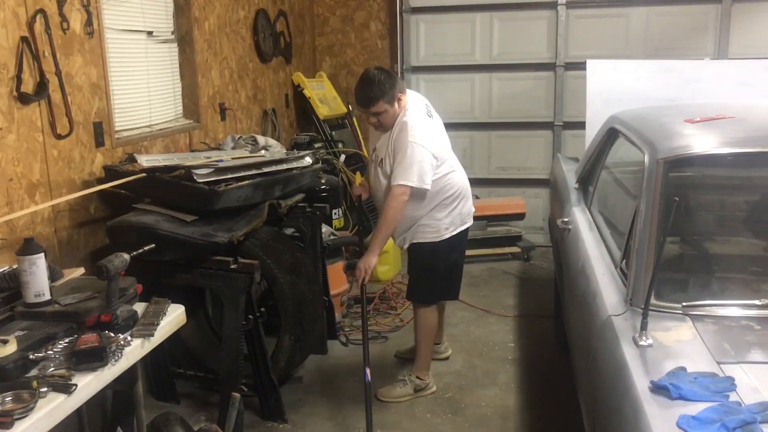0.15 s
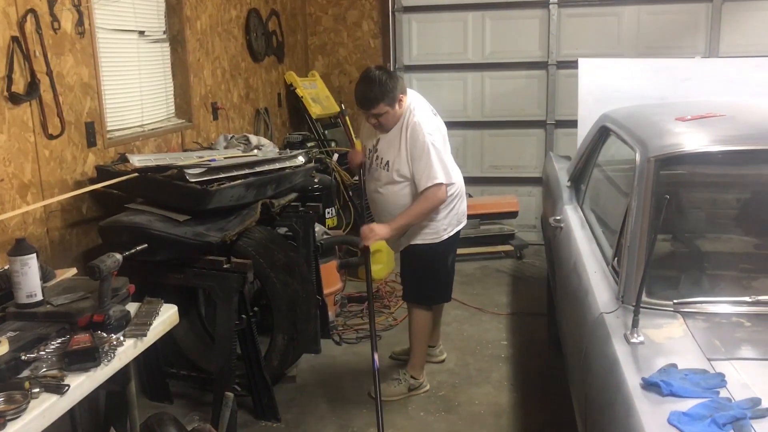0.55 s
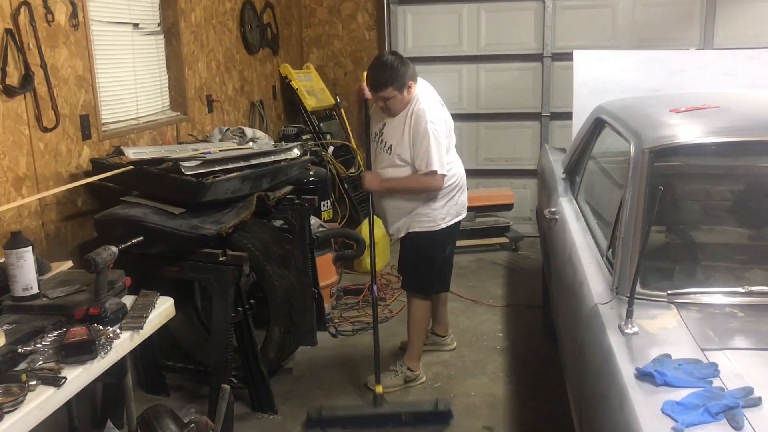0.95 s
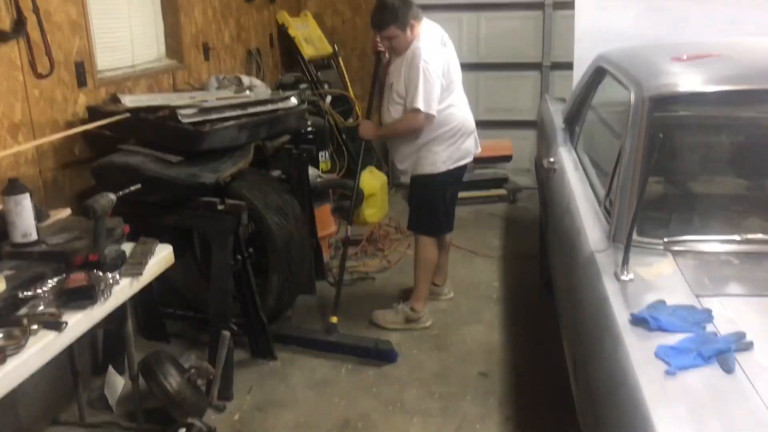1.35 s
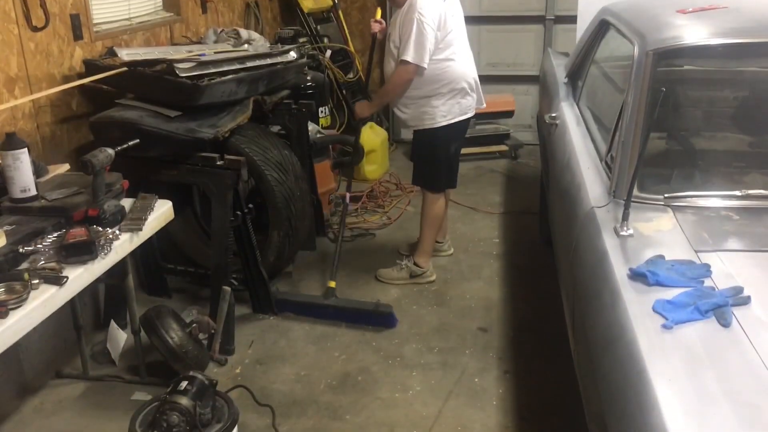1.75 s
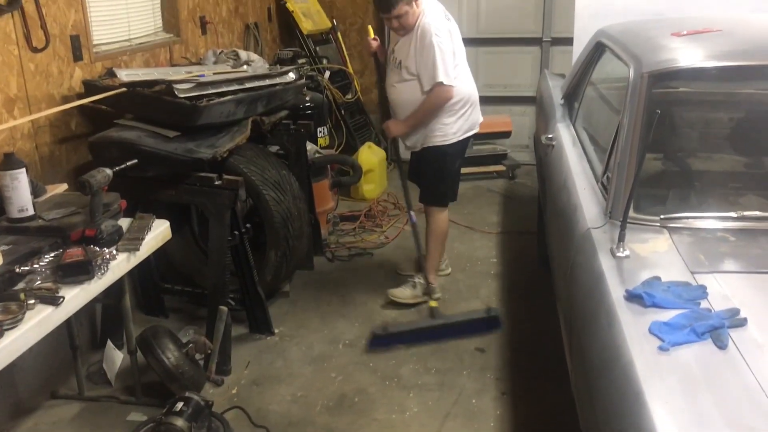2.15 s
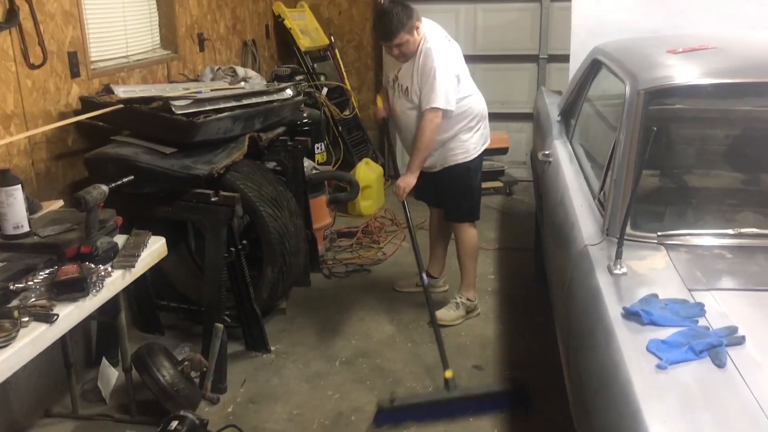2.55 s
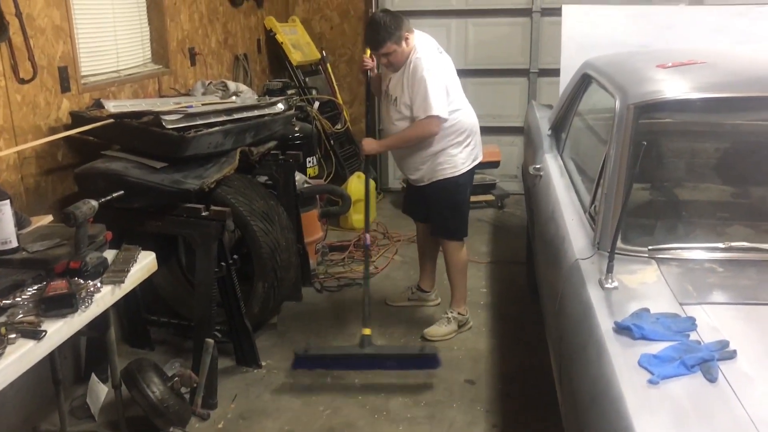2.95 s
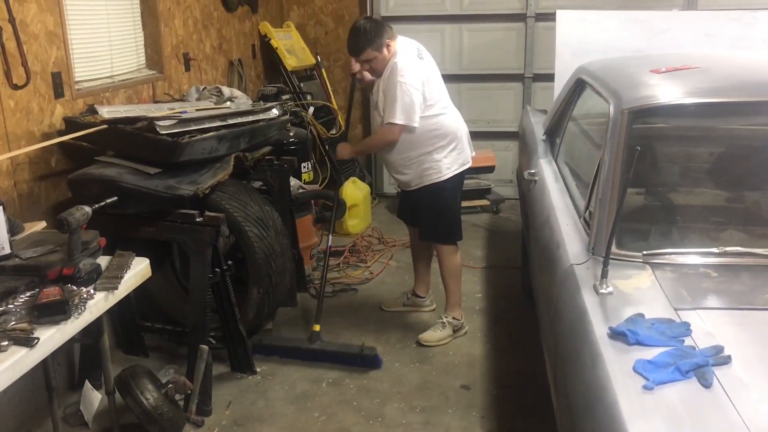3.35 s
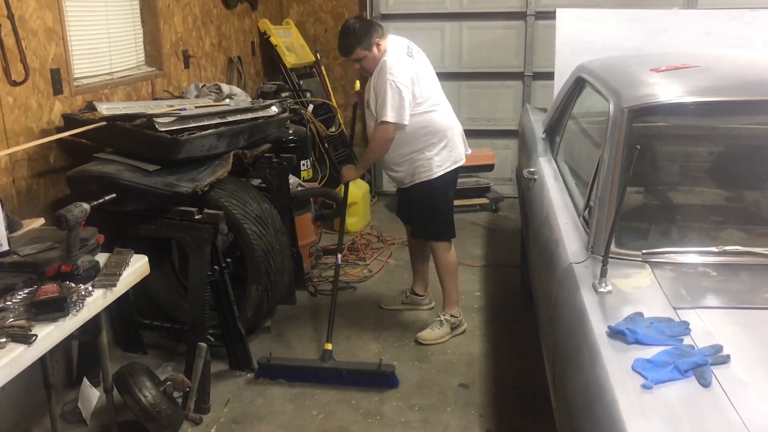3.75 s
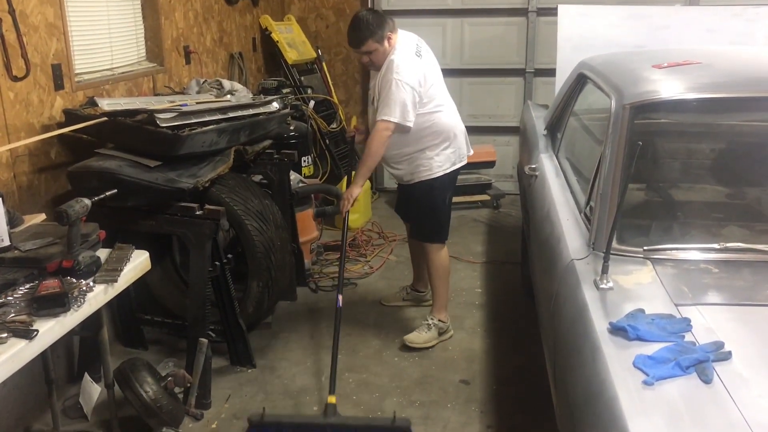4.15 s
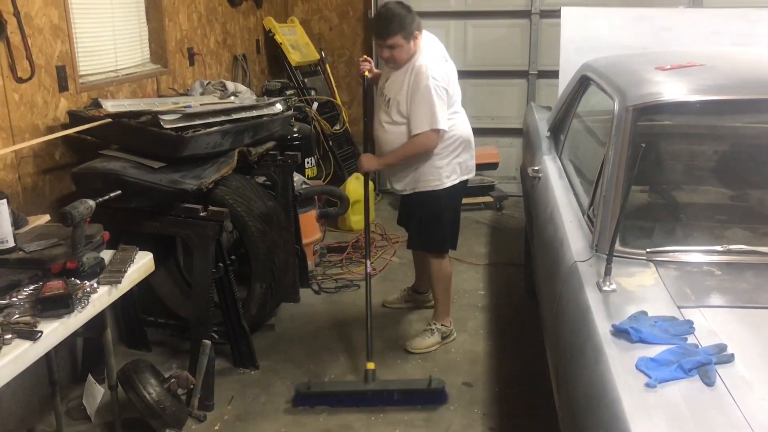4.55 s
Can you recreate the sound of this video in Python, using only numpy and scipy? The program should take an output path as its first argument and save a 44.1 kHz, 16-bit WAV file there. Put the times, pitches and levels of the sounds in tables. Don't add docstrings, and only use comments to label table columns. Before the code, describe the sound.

Uneven broom strokes swish and rasp across a hard floor, a small scrap rattling early, over faint low rumble and room hiss.

```python
import sys
import numpy as np
from scipy import signal
from scipy.fft import rfft, irfft, next_fast_len
from scipy.io import wavfile
from scipy.ndimage import map_coordinates

SR = 44100
rng = np.random.default_rng(int(sys.argv[2]) if len(sys.argv) > 2 else 0)


def voltage_ratio(decibels):
    exponent = np.asarray(decibels, float) / 20
    return 10 ** exponent


def store_pcm(level_fs):
    pcm = np.round(np.clip(level_fs, -1, 1) * 32767).astype(np.int16)
    wavfile.write(sys.argv[1], SR, np.atleast_2d(pcm).T)


N = 208063

# f/Hz, density/dB per Hz
AIR_SPECTRUM = [(53, -27), (90, -8.5), (139, -8), (158, -8), (196, -8), (264, -6.5), (301, -8),
                (600, -24.5), (654, -20), (1330, -19.5), (2890, -29), (3370, -23), (4850, -37),
                (10300, -37.5), (15600, -30.5)]
# f/Hz, width/Hz, level/dB
INSECT_BAND = (3420, 340, -78)
# t/s, f/Hz, level/dB
ENGINE_ORDER = [(0.3, 59, -68), (0.48, 56.3, -49), (0.6, 56.7, -54), (0.9, 59.4, -49.5),
                (1.74, 69.3, -54.5), (1.86, 68.5, -70), (2.05, 69.5, -50), (2.15, 69.4, -59),
                (2.33, 76, -64), (2.62, 77, -51.5), (2.7, 78, -70), (2.96, 83.4, -62), (3.3, 81, -78)]
# t/s, level/dB
ROAD_LEVEL = [(0.0, -52), (0.19, -51), (0.3, -53.5), (0.96, -47), (1.05, -58), (1.54, -47), (2.04, -48.5),
              (2.14, -50.5), (3.11, -47), (3.3, -53.5), (3.47, -43), (3.57, -58), (3.65, -45), (3.75, -57),
              (4.0, -52), (4.18, -55), (4.6, -54)]
# f/Hz, density/dB per Hz
ROAD_SPECTRUM = [(18, -46), (30, -14), (44, -2.5), (59, 4), (74, 1.5), (130, -10.5), (170, -52),
                 (290, -120)]
# f/Hz, t60/s
GARAGE_DECAY = [(200, 0.76), (1000, 0.31), (4000, 0.53), (8000, 0.4), (15000, 0.29)]
# f/Hz, width/Hz, level/dB
SCRAP_MODES = [(5900, 250, -4), (7270, 74, 8), (9000, 480, 3), (10900, 280, -1)]
# t/s, level/dB
SCRAP_ROLL = [(.27, -92), (.29, -41), (.35, -62), (.4, -48), (.45, -46), (.5, -60), (.62, -59), (.66, -90)]
# t/s, peak level/dB
SCRAP_HOPS = [(0.2883, -30), (0.371, -38), (0.3842, -34.5), (0.407, -36.5), (0.423, -41), (0.4393, -41),
              (0.449, -44), (0.4654, -36.5), (0.4786, -43), (0.4947, -42), (0.5266, -42), (0.5554, -46)]
# t/s, peak level/dB, low ring f/Hz, high ring share/dB
HEAD_KNOCKS = [(0.654, -38, 850, -15), (0.79, -37, 620, -3), (0.815, -32, 1176, -13), (0.84, -35, 710, -9),
               (0.9, -48, 610, -6), (0.874, -36, 925, -14), (0.889, -33.5, 793, -2),
               (1.914, -20.5, 422, -9.5), (1.926, -23, 605, -15), (1.936, -28, 763, 0),
               (1.947, -27, 880, -1), (1.953, -27, 1153, 0), (1.962, -32, 1115, 0), (1.986, -34, 1166, -5),
               (3.262, -37, 1370, -8), (3.295, -35.5, 1410, -10), (3.642, -39, 1006, -9),
               (3.667, -23.5, 1152, -11), (3.669, -31, 624, -10), (3.677, -24, 1160, 1),
               (3.684, -33, 1235, 9), (3.799, -39, 1290, 5), (4.628, -26, 1245, -23),
               (4.65, -21, 1180, -22), (4.642, -26, 1346, -23), (4.659, -31, 1393, -2),
               (4.664, -22.5, 1240, -26), (4.677, -29, 1245, -21), (4.689, -31, 1246, -17),
               (4.705, -26, 1320, -12)]
# t/s, peak level/dB, ring f/Hz
GRIT_SKIPS = [(0.1258, -24, 4100), (0.2887, -26, 8530), (0.295, -21, 8500), (0.3047, -28, 3600),
              (0.3837, -21, 5510), (0.423, -26, 10900), (1.914, -26, 3300), (1.922, -27, 3410),
              (1.931, -26, 3410), (1.939, -30, 3300), (1.95, -40, 3300), (2.9698, -47, 2060),
              (2.9705, -56, 2650), (3.2608, -29.5, 4060), (3.2755, -28, 2700), (3.3101, -31, 2140),
              (3.3955, -41, 9000), (3.6672, -26, 2110), (3.668, -22, 3130), (3.826, -25, 8560),
              (4.029, -24, 8400), (4.626, -32, 4500), (4.6286, -19, 5600), (4.6418, -39, 2340),
              (4.6476, -21, 4230)]
# t/s, peak level/dB, f/Hz
FLOOR_THUDS = [
    (1.914, -46, 285),
    (1.93, -43, 163),
    (3.449, -51, 249),
    (4.64, -42, 156),
    (4.663, -37, 264),
    (4.662, -26.5, 81),
    (4.688, -31, 80),
    (4.689, -39.5, 141),
]
# f/Hz, density/dB per Hz
TIP_SPECTRUM = [(1290, -27.5), (2200, -5.5), (2340, -6.5), (2850, -8.5), (4120, 1), (4610, -1),
                (5000, -4.5), (5470, -1), (6020, 0), (7720, -8), (8500, -7.5), (11000, -16), (18700, -120)]
# f/Hz, density/dB per Hz
SIZZLE_SPECTRUM = [(4410, -16), (7500, -9), (9600, 1), (10300, -5), (11200, 0.5), (14100, 2), (15600, -1.5)]
# f/Hz, density/dB per Hz
HEAD_SPECTRUM = [(530, -60), (900, -17), (940, -6), (1190, 4), (1300, 3), (2330, 3), (2560, 1.5),
                 (3300, -3), (4290, -13), (7260, -120)]
# f/Hz, density/dB per Hz
HANDLE_SPECTRUM = [(210, -19), (350, -2.5), (460, -9), (582, -3), (757, -1.5), (825, 2.5), (1100, -1.5),
                   (1430, -61), (2420, -120)]
# t/s, bristle speed as tip level/dB, weight on the head/dB, bristles facing the microphone/dB
PUSH_1 = [(0.0, -36, -8.5, -1), (0.1, -34, -12, -1.5), (0.24, -35.5, -7.5, -0.5), (0.37, -41, -5.5, -4),
          (0.428, -47.5, -2, -1), (0.594, -53.5, -4, -3), (0.62, -56, -3.5, -3)]
DRAG_1 = [(0.635, -55, 0.5, 5), (0.653, -49, 0.5, 5), (0.701, -44.5, -5, 3), (0.805, -45, -2, 3.5),
          (0.865, -52, 3.5, 2), (0.875, -49, 3.5, 8), (0.936, -62, 8.5, 1), (1.024, -61.5, 1.5, -13),
          (1.12, -72.5, 6, 1)]
DRAG_SHORT = [(1.234, -59.5, -4, -2), (1.254, -49.5, -7, -3), (1.294, -46, 0.5, -6), (1.34, -51, 3, 3),
              (1.448, -46.5, -6, 2.5), (1.54, -45.5, -2, -0.5), (1.6, -53.5, -0.5, -1),
              (1.68, -57.5, -3, 1)]
TURNING = [(1.72, -52.5, -6, 0), (1.745, -46.5, -12, 0), (1.8, -45.5, -6, -1.5), (1.9, -48, -3.5, 1.5)]
DRAG_BUMPED = [(1.916, -42, -2.5, -9), (1.956, -43, 3, 1), (2.026, -49.5, 1, 0), (2.052, -41.5, -4, -1.5),
               (2.142, -41.5, -6.5, -0.5)]
PUSH_2 = [(2.384, -46, -7, 0), (2.554, -34.5, -11, -0.5), (2.626, -34, -8, 1.5), (2.652, -35, -7, 1.5),
          (2.738, -48, -3.5, -4.5), (2.86, -71, 4.5, -15)]
SETTING_DOWN = [(3.261, -51.5, 2.6, 9), (3.286, -51, 3.1, 2), (3.308, -47.5, 2, 4), (3.356, -61, 11, 1),
                (3.383, -60, 6.5, -7)]
DRAG_2 = [(3.396, -48, 4.5, 5), (3.444, -50.5, 3.5, 0), (3.528, -42.5, -10.5, 0.5), (3.641, -41.5, -12, 0),
          (3.646, -40.5, -1, -3), (3.665, -38, -4, -5), (3.669, -46.5, 15, 6), (3.7, -40.5, 1, -1.5),
          (3.81, -42.5, 1, 0)]
PUSH_3 = [(3.938, -45, -4, 0), (4.044, -38.5, -11, 0), (4.166, -34, -8, 2), (4.236, -35.5, -6, -0.5),
          (4.384, -59.5, 0, -8.5), (4.546, -76, 0, 8), (4.61, -63.5, -4, -1)]
SLAMMING = [(4.629, -34.5, -8.5, -3), (4.641, -43.5, 9, 0), (4.642, -32, -0.5, 6), (4.665, -38.5, 2, -3),
            (4.718, -45.5, 2, -2)]
# handle share/dB, upper against lower tip ridge/dB, top-octave tilt/dB
STROKE_GRIPS = [
    (-7, 1.5, 3),
    (-5.5, -2, 1),
    (-8.5, 0, -4),
    (-6, 2, -3),
    (-4.5, 3, -1),
    (-8, -.6, 1),
    (-9, -2, -3),
    (-9.5, 3, -2),
    (-8.5, -0.5, -1),
    (-3.5, -5, -3),
]


def unit(x):
    return x / np.sqrt(np.mean(x ** 2) + 1e-20)


def along(points, hz):
    f, v = np.transpose(points)
    return np.interp(np.log(hz + 1), np.log(f + 1), v)


def curves(rows):
    s, *cols = np.transpose(rows)
    return [np.interp(np.arange(N) / SR, s, c) for c in cols]


def wobble(rate):
    knots = rng.standard_normal(int(N * rate / SR) + 4)
    return map_coordinates(knots, [np.arange(N) * rate / SR])


def coloured(x, spectrum):
    m = next_fast_len(N + 8192)
    gain = voltage_ratio(along(spectrum, np.fft.rfftfreq(m, 1 / SR)))
    return unit(irfft(rfft(x, m) * gain, m)[:N])


def lean(x, hz, db):
    highpass = signal.butter(4, hz, "high", fs=SR, output="sos")
    top = signal.sosfiltfilt(highpass, x)
    return voltage_ratio(db / 2) * top + voltage_ratio(-db / 2) * (x - top)


def ticks(spread_db, clump_db, rate):
    size = np.minimum(rng.exponential(size=N), 4)
    return rng.standard_normal(N) * voltage_ratio(spread_db * size + clump_db * wobble(rate))


def ring(s, db, hz, t60, spread, count, crack=0.):
    out, t = np.zeros(N + SR), np.arange(SR // 4) / SR
    detune = spread * np.linspace(-1, 1, count) + 0.03 * rng.standard_normal(count)
    pitch = np.minimum(hz * np.exp(detune)[:, None], SR / 3)
    swell = voltage_ratio(-60 * t / t60) * (1 - np.exp(-t * hz * 2.4))
    wave = swell * np.sin(2 * np.pi * pitch * t).sum(0) / np.sqrt(count)
    burst = np.convolve(rng.standard_normal(len(t)), [1, 0, -1], "same")
    snap = crack * voltage_ratio(-60 * t / .005) * burst
    out[round(s * SR):][:len(t)] = voltage_ratio(db) * (wave + snap)
    return out[:N]


def air():
    hz, width, db = INSECT_BAND
    band = [(hz - 2 * width, -40), (hz - width / 2, 0), (hz + width / 2, 0), (hz + 2 * width, -40)]
    chorus = voltage_ratio(db + 0.54 * wobble(11.3)) * coloured(rng.standard_normal(N), band)
    floor = voltage_ratio(-62 + 0.09 * wobble(5.0)) * coloured(rng.standard_normal(N), AIR_SPECTRUM)
    return chorus + floor


def engine():
    hz, db = curves(ENGINE_ORDER)
    t = np.arange(N) / SR
    edge = np.minimum(t - ENGINE_ORDER[0][0], ENGINE_ORDER[-1][0] - t)
    heard = np.clip(edge / 0.22, 0, 1)
    phase = 2 * np.pi * np.cumsum(hz + 1.05 * wobble(13.2)) / SR
    order = heard * voltage_ratio(db) * np.sqrt(2) * np.sin(phase)
    road_db = curves(ROAD_LEVEL)[0] - 3 - 4 * heard
    return order + voltage_ratio(road_db) * coloured(rng.standard_normal(N), ROAD_SPECTRUM)


def garage(x):
    hz, t, z = signal.stft(rng.standard_normal(SR * 3 // 4), SR, nperseg=256)
    decay = voltage_ratio(-60 * t / along(GARAGE_DECAY, hz)[:, None])
    tail = signal.istft(z * decay, SR, nperseg=256)[1]
    delayed = np.pad(x, (300, 0))
    return signal.fftconvolve(delayed, tail / np.linalg.norm(tail))[:N]


def pebble():
    contacts = ticks(spread_db=3.0, clump_db=0.5, rate=87)
    f = np.fft.rfftfreq(N, 1 / SR)
    body = sum(voltage_ratio(db) * 1j * f * w / (hz * hz - f * f + 1j * f * w) for hz, w, db in SCRAP_MODES)
    return voltage_ratio(curves(SCRAP_ROLL)[0]) * unit(irfft(rfft(contacts) * body, N))


def hops():
    modes = [4010] + [hz for hz, _, _ in SCRAP_MODES]
    out = np.zeros(N)
    for s, db in SCRAP_HOPS:
        for hz in modes:
            luck_db = 3 * rng.standard_normal()
            out += ring(s, db + luck_db, hz, t60=0.009, spread=0., count=1, crack=0.29)
    return out


def knocks():
    t60 = 0.067
    out = np.zeros(N)
    for s, db, hz, share_db in HEAD_KNOCKS:
        low_t60 = t60 * 1.25 * hz / 1000
        out += ring(s + 0.0011, db - 9.0, hz, low_t60, spread=0.043, count=2)
        high_db = db + share_db - 2.5
        out += ring(s + 0.000927, high_db, hz * 1.65, t60 * 0.65, spread=0.072, count=2)
    for s, db, hz in GRIT_SKIPS:
        out += ring(s + 0.00046, db - 11.5, hz, t60=0.036, spread=0.034, count=2, crack=voltage_ratio(-9))
    for s, db, hz in FLOOR_THUDS:
        out += ring(s, db, hz, t60=0.065, spread=0.064, count=2)
    return out


def strokes():
    fade_db_per_s, lifted_db = 70, -84
    each = [PUSH_1, DRAG_1, DRAG_SHORT, TURNING, DRAG_BUMPED,
            PUSH_2, SETTING_DOWN, DRAG_2, PUSH_3, SLAMMING]
    held = [[(*row, *grip) for row in stroke] for stroke, grip in zip(each, STROKE_GRIPS)]
    push, drag, short, turn, bumped, push2, down, drag2, push3, slam = held
    runs = [push, drag, short + turn, bumped + push2, down, drag2 + push3, slam]
    rows = []
    for run, after in zip(runs, runs[1:]):
        s, db, *rest = run[-1]
        land = after[0][0] - .0015
        quiet = min(land - .001, s + max(db - lifted_db, 0) / fade_db_per_s)
        faded = db - fade_db_per_s * (quiet - s)
        rows += [*run, (quiet, faded, *rest), (land, faded, *rest)]
    rows = np.array(rows + runs[-1])
    return curves(rows[np.argsort(rows[:, 0], kind="stable")])


def sweep():
    tips_db, head_db, facing_db, grip_db, ridge_db, tilt_db = strokes()
    handle_db = grip_db + 1.48 * np.minimum(head_db, 5)
    top_db = tilt_db + .3 * facing_db
    press_db = 0.19 * wobble(25.03)
    tip_ticks = ticks(spread_db=1.5, clump_db=0.0, rate=270)
    tips = lean(coloured(tip_ticks, TIP_SPECTRUM), 7600, ridge_db)
    fine_ticks = ticks(spread_db=1.5, clump_db=1.0, rate=400)
    sizzle = voltage_ratio(facing_db) * lean(coloured(fine_ticks, SIZZLE_SPECTRUM), 11000, top_db)
    shake = ticks(spread_db=2.0, clump_db=0.6, rate=110)
    head = voltage_ratio(head_db) * coloured(shake, HEAD_SPECTRUM)
    handle = voltage_ratio(handle_db) * coloured(shake, HANDLE_SPECTRUM)
    return voltage_ratio(tips_db - 1.5 + press_db) * (tips + sizzle + head + handle)


def scene():
    brush = sweep()
    hits = knocks() + pebble() + hops()
    echo = garage(voltage_ratio(-13) * brush + voltage_ratio(-5.5) * hits)
    mono = brush + hits + echo + engine() + air()
    return np.array([mono, mono])


def low_pass(x):
    return signal.sosfilt(signal.butter(12, 16870, fs=SR, output="sos"), x)


def record(dry):
    low_hz, top_hz = 42.4, 15760
    hz = np.fft.rfftfreq(N, 1 / SR)
    response = (hz < top_hz) * hz ** 2 / (hz ** 2 + low_hz ** 2)
    mix = irfft(rfft(dry) * response, N)
    return low_pass(mix)


dry = scene()
out = record(dry)
store_pcm(out)
```